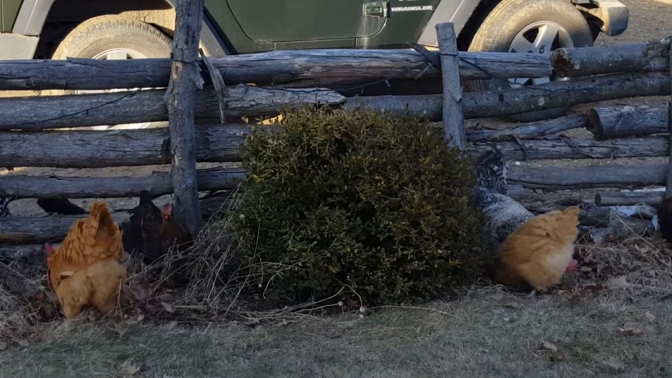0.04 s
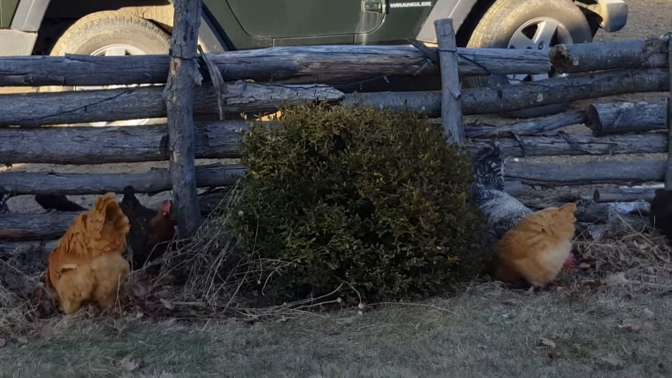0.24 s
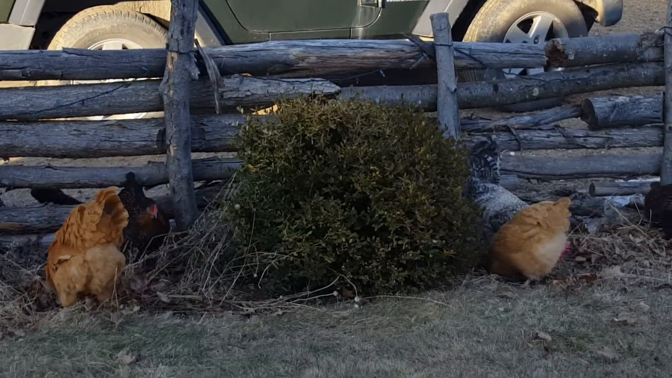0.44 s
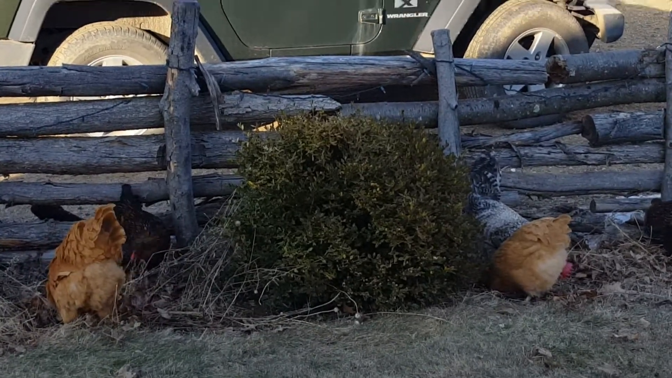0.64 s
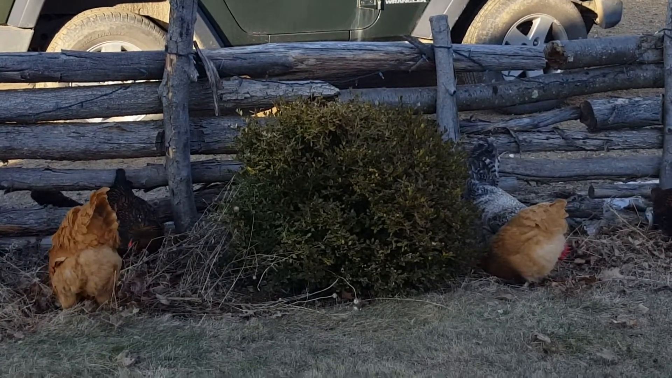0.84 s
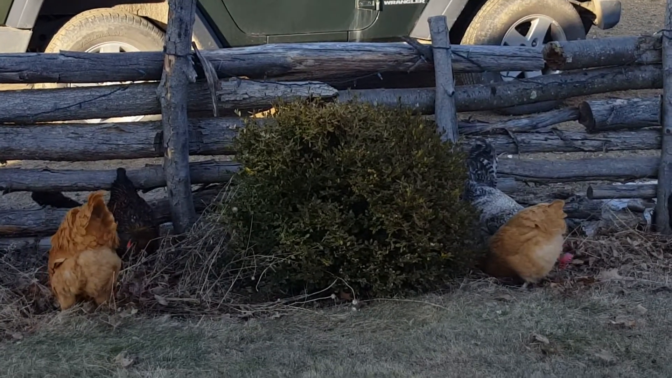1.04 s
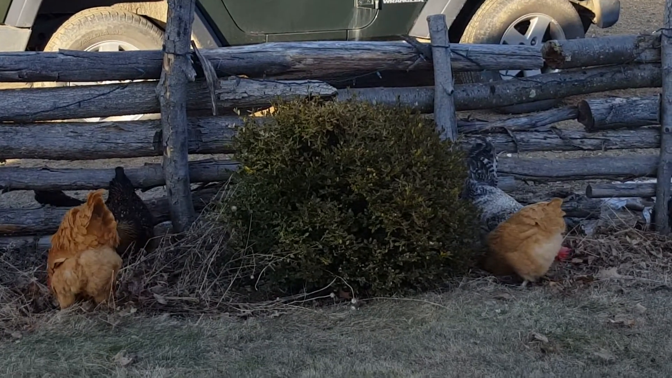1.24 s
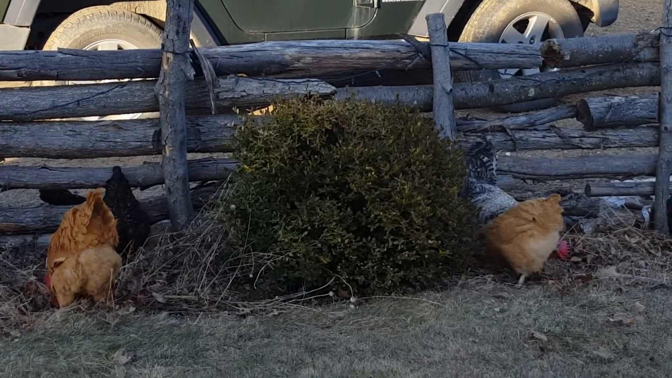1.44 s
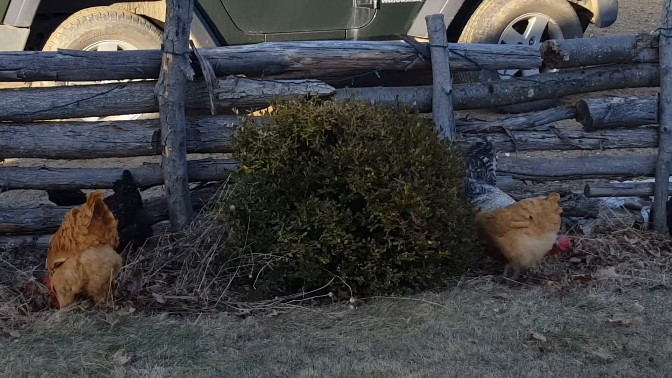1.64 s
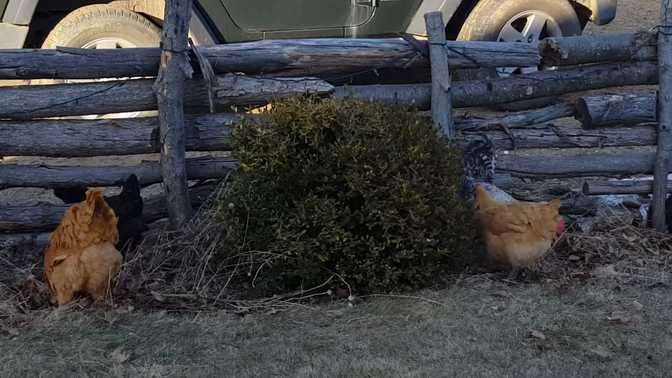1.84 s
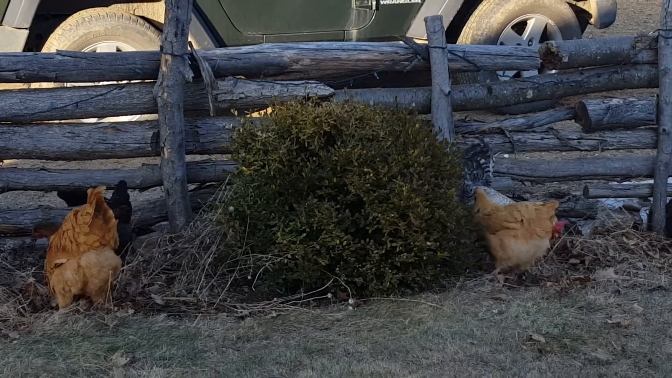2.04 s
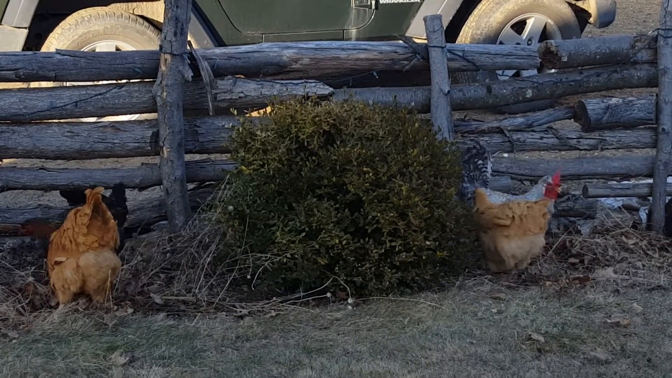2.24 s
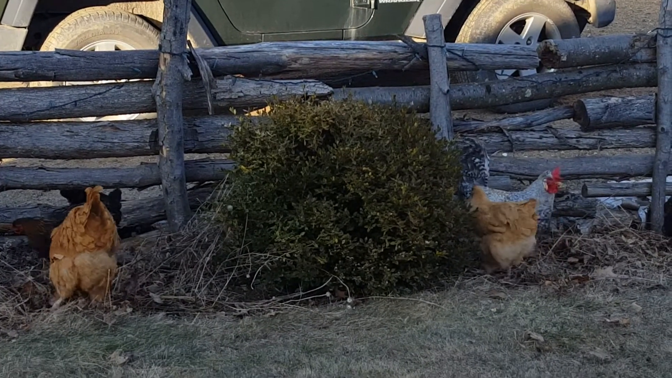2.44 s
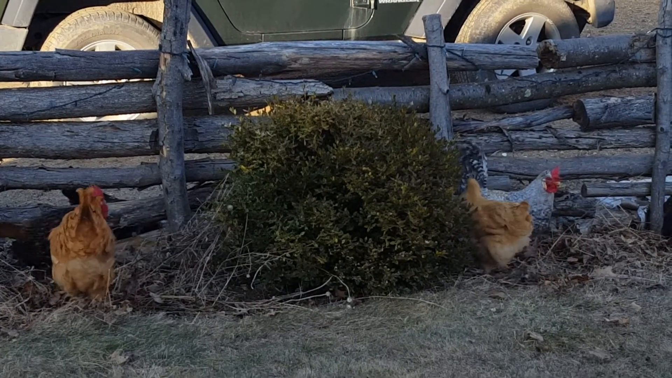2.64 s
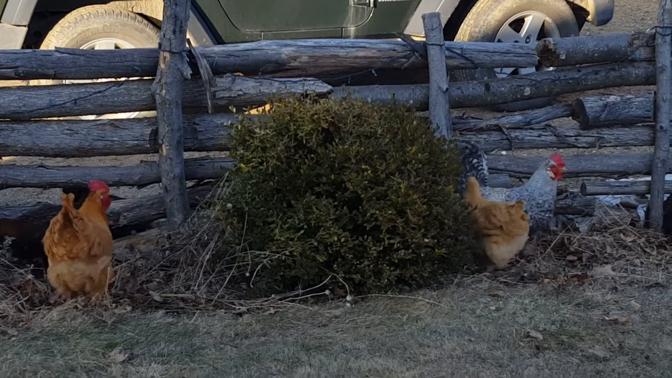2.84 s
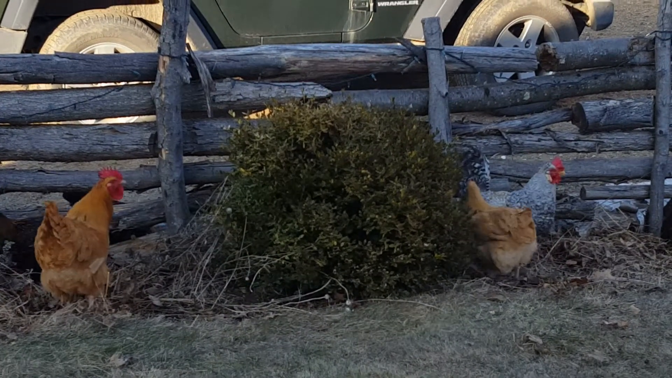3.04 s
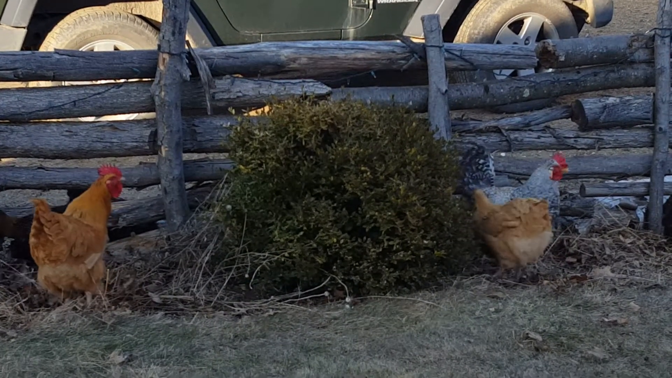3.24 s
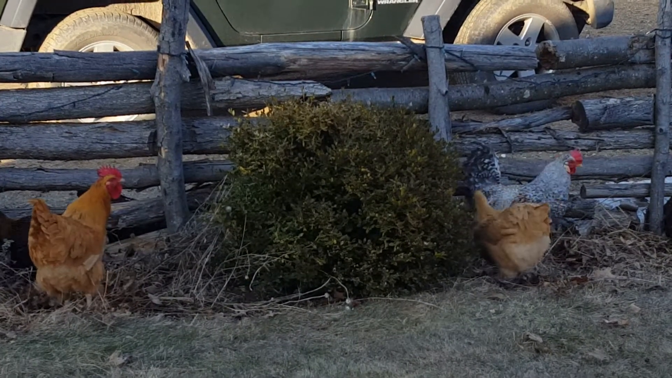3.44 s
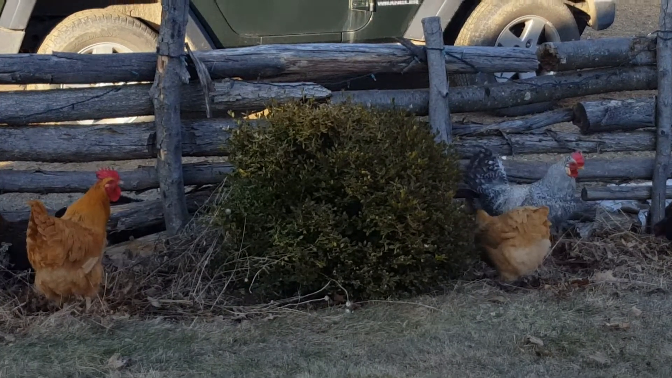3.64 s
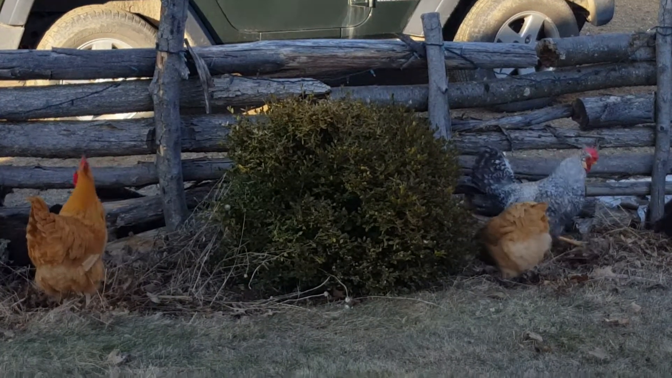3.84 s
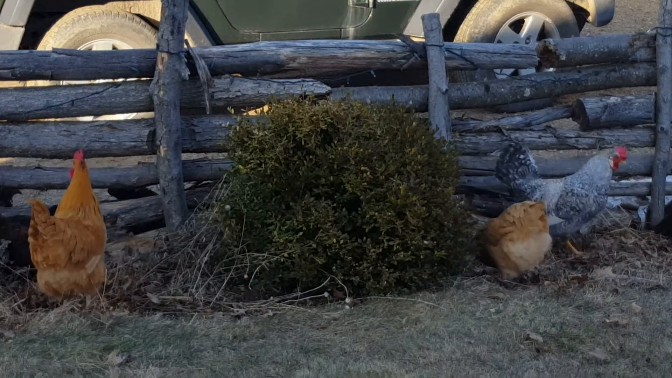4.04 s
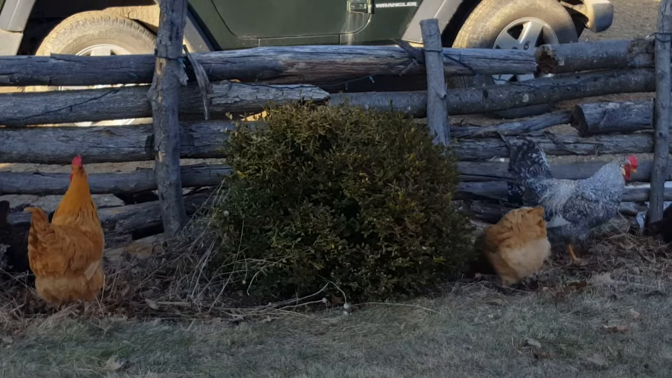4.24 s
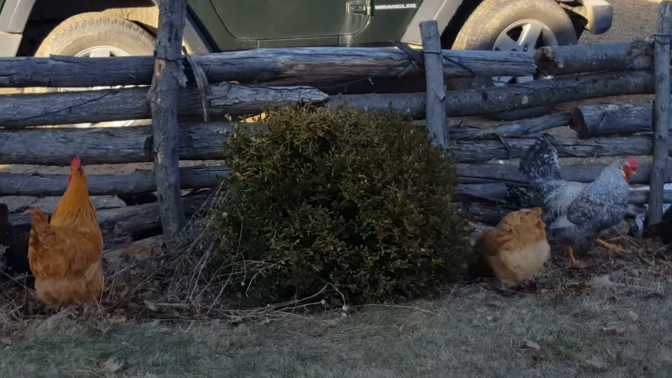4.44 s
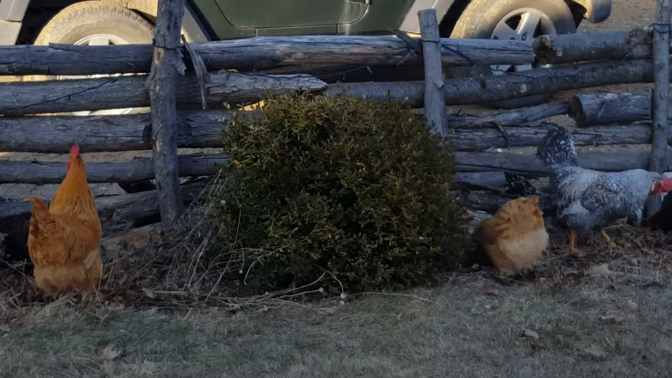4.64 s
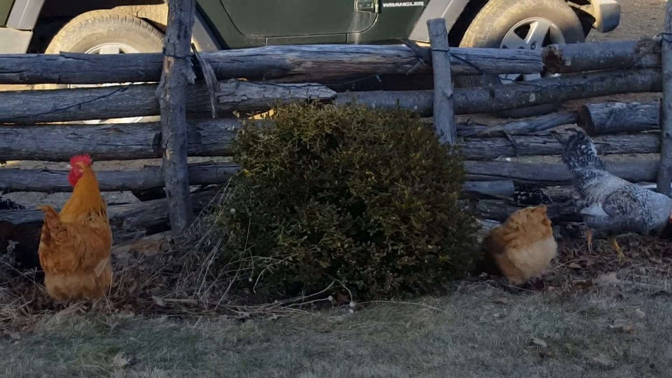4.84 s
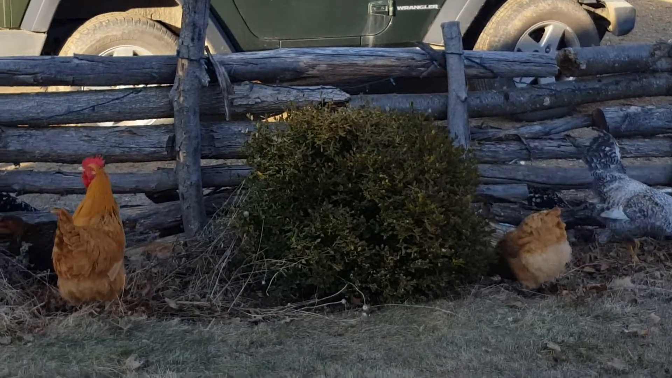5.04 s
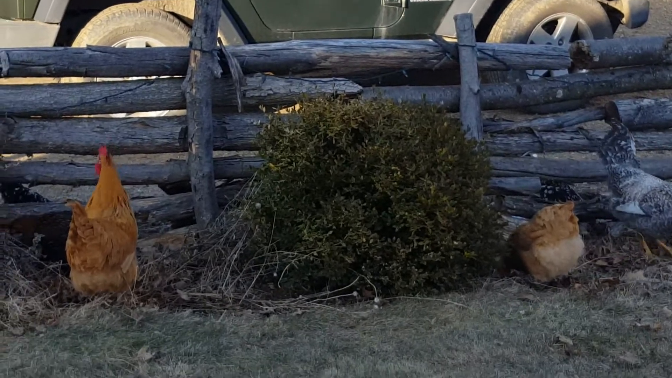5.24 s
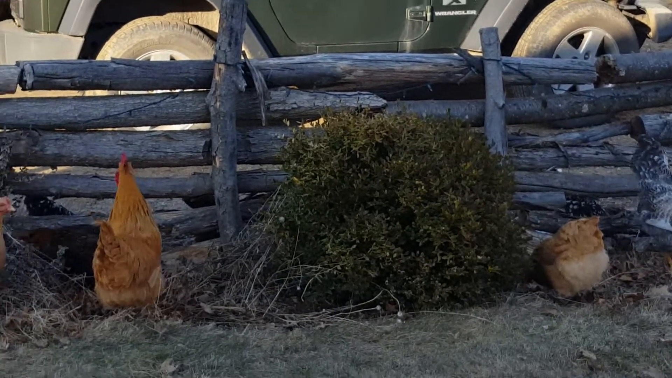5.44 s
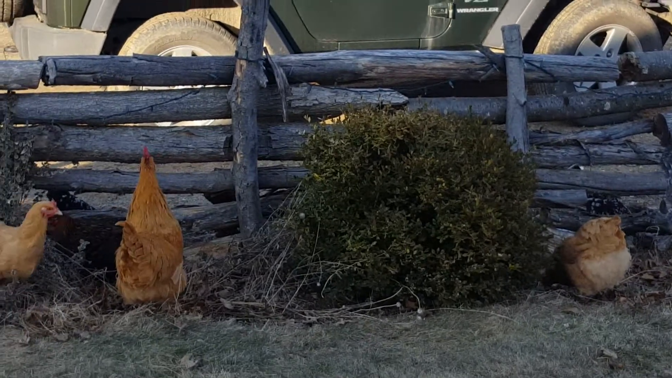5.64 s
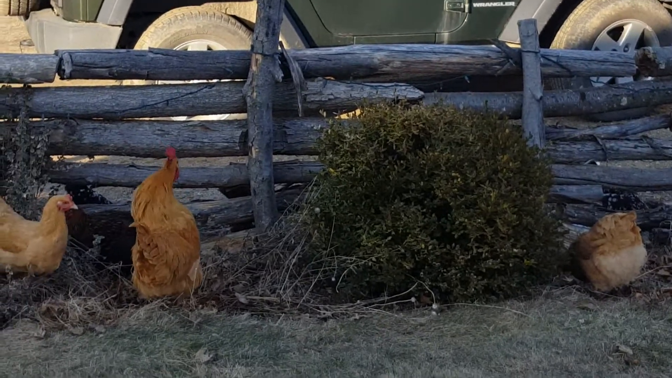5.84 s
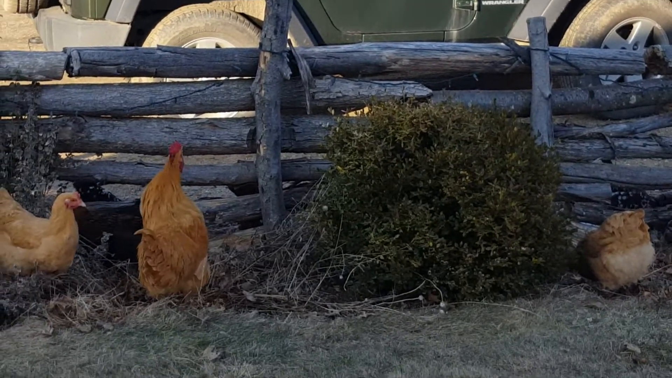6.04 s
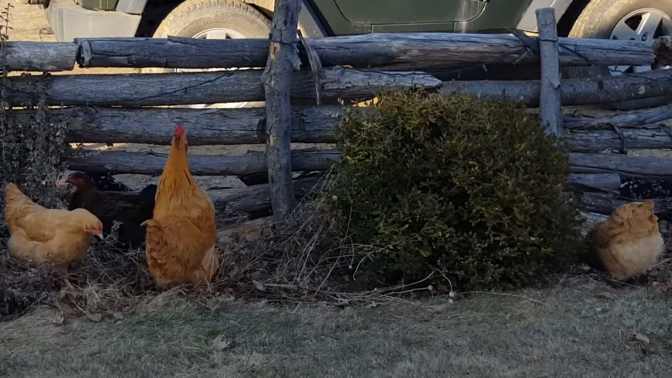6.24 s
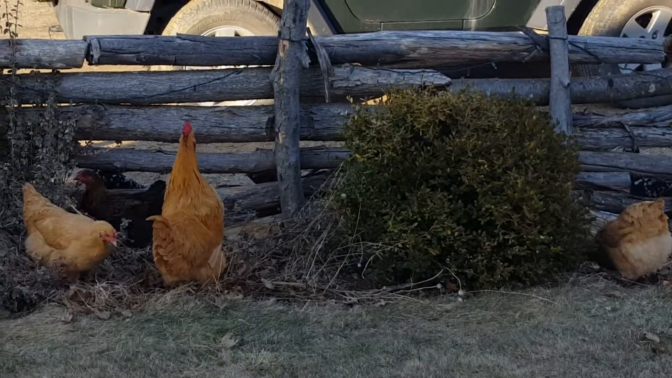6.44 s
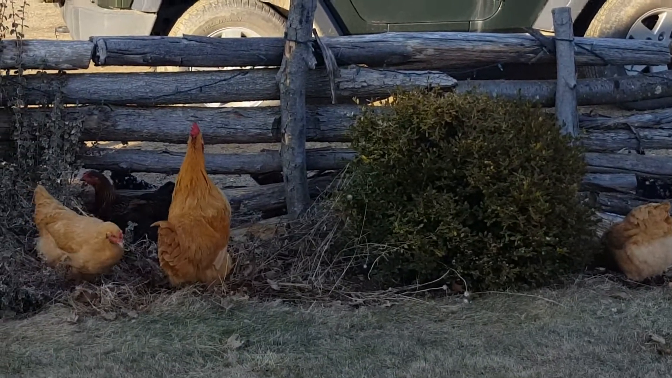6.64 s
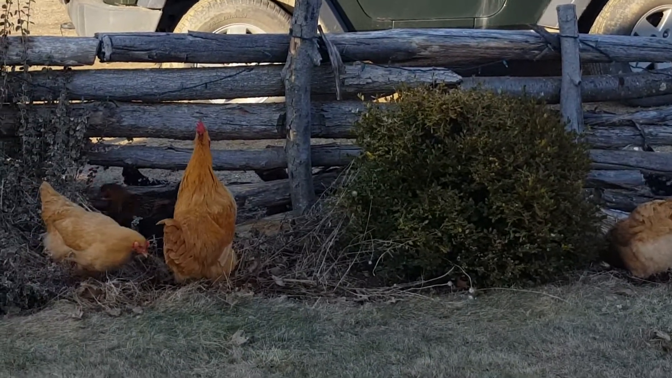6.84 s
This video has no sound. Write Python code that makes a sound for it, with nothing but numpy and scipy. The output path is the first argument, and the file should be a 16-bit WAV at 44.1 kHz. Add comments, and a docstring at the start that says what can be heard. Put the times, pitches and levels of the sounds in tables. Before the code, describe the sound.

Chickens scratch in dry leaves with a soft cluck over a faint outdoor rumble, then a nearby rooster crows loudly.

```python
"""A yard by a log fence, under a far outdoor rumble. Hens scratch in dry leaves and twigs, each stroke
a swarm of tiny cracks; one hen clucks and murmurs softly. The hand-held microphone is bumped a few
times, and a rooster close by crows: one hoarse syllable, then two in which a clear pitch rises through
the rasp. His membranes slap irregularly for the rasp, and one tightens for the clear pitch;
windpipe and beak colour the crow, and fence and sheds echo it."""
import sys
import numpy as np
from scipy import signal
from scipy.io import wavfile

SR = 44100
rng = np.random.default_rng(int(sys.argv[2]) if len(sys.argv) > 2 else 0)


def dump_mix(stems):
    """Bounce the given channels to the path in sys.argv[1] as a 16-bit WAV at rate SR."""
    frames = np.atleast_2d(stems).T  # one column per channel
    limited = np.clip(frames, -1, 1)  # hard clip at full scale
    pcm = np.round(limited * 32767).astype(np.int16)
    wavfile.write(sys.argv[1], SR, pcm)


N = 304290

# The crow's syllables. Each row: start, push and end in seconds, rasp level in dB, change by the end
# in dB, then the slack membrane's first pitch in Hz, held pitch in Hz and level in dB.
SYLLABLES = [(5.961, 6.013, 6.155, -20, -1, 724, 673, -29), (6.254, 6.298, 6.385, -23, -5, 684, 631, -25.5),
             (6.487, 6.524, 6.95, -21, -1.5, 635.8, 652, -22.5)]
START_DB, LEAD_IN_DB, RELEASE_DB = -29, -4.5, -27   # stages of a syllable, against full strength
PUSH_S = 0.017   # from lead-in to full strength
STAMP_DB_PER_S = 1197   # attack of a stroke that sets in at once


def rasp():
    """The rooster's membranes slap irregularly; the pulses ring his windpipe and beak."""
    # Throat resonances, neck bent and neck stretched. Each row: centre in Hz, width in Hz, level in dB.
    neck_bent = [(514, 97, -9.5), (710, 300, -12), (1106, 157, -2.5), (1374, 72, 6), (1730, 360, -25),
                 (2010, 350, -26), (2556, 174, -22), (3590, 730, -36), (4570, 620, -30), (5450, 230, -34.5),
                 (6050, 1200, -35.5), (11500, 6200, -48)]
    neck_stretched = [(666, 49, -3), (980, 180, -12.5), (1280, 293, -2), (1846, 54, -14), (1972, 143, -12),
                      (2733, 244, -21), (3520, 590, -37), (4860, 750, -34), (6170, 610, -33.5),
                      (7370, 700, -38), (10140, 2700, -40), (13200, 2400, -48)]
    pulses = grains(1400, spread_db=-1.0)[0, 0] * from_db(0.69 * drift(52))
    out, first = np.zeros(N), int(SYLLABLES[0][0] * SR) - SR // 10
    for syllable, throat in zip(SYLLABLES, (neck_bent, neck_stretched, neck_stretched)):
        curve = effort(*syllable[:5])
        envelope = from_db(in_time(curve)[0]) * gate(curve)
        # each resonance acts twice, which leaves dark valleys between them
        rung = sum((-1) ** k * from_db(db) * steep_resonance(pulses[first:], hz, width_hz)
                   for k, (hz, width_hz, db) in enumerate(throat))
        out[first:] += envelope[first:] * rms_one(rung)
    return out


def clear_voice():
    """One membrane tightens to a clear pitch in the last two syllables."""
    # Each row: slack pitch in Hz, accent at the push in dB, held level in dB, swell in dB per second,
    # moment of slackening in seconds.
    notes = [(691, -22, -27.5, 155, 6.383), (664, -16, -25, -4.5, 6.95)]
    # Each row: multiple of the pitch, level in dB. Alternating strong and weak cycles give the halves.
    partials = [(1, 4), (1.5, -9), (2, -6), (2.5, -14.5), (3, -20.5), (3.5, -23), (6, -22), (7, -31),
                (8, -24)]
    voice = sum(voiced(tightening(*syllable[:2], *note), partials,
                       wobble=.011, flutter_db=3.0, slack_db=56, waver=.011)
                for syllable, note in zip(SYLLABLES[1:], notes))
    windpipe = from_db(3) * resonance(voice, hz=1393, width_hz=92)   # lifts the overtone that passes it
    return voice + windpipe


def slack_buzz():
    """The other membrane stays slack and buzzes unsteadily below the clear pitch."""
    # Each row: multiple of the pitch, level in dB.
    partials = [(1, -9), (2, -1.5), (3, -19)]
    out = 0
    for start, push, end, _, change_db, first_hz, held_hz, db in SYLLABLES:
        curve = [(s, np.interp(s, [start, push], [first_hz, held_hz]), level_db)
                 for s, level_db in effort(start, push, end, db, change_db)]
        out = out + voiced(curve, partials, wobble=.022, flutter_db=4.0, waver=0.0117)
    return out


def effort(start, push, end, db, change_db):
    """Level curve of a syllable: it opens quickly to a soft lead-in, is pushed, held and released."""
    last_db = db + change_db
    return [(start, db + START_DB), (start + 0.0052, db - 7.5),
            (push - PUSH_S, db + LEAD_IN_DB), (push, db), (end, last_db),
            (end + PUSH_S, last_db + LEAD_IN_DB), (end + .06, last_db + RELEASE_DB)]


def tightening(start, push, slack_hz, accent_db, held_db, swell_db_per_s, slackens):
    """Pitch and level curve of the clear voice: accent on the slack pitch, rise, hold, drop."""
    taut_hz, tighten_s, slacken_s = 784.4, .03, 0.0277
    taut = push + tighten_s
    last_db = held_db + swell_db_per_s * (slackens - taut)
    return [(start, slack_hz, accent_db + START_DB),
            (push - PUSH_S, slack_hz, accent_db - 18.5),
            (push, slack_hz, accent_db),
            (push + tighten_s / 2, (slack_hz + taut_hz) / 2, held_db - 6),   # dips midway up
            (taut, taut_hz, held_db),
            (slackens, taut_hz, last_db),
            (slackens + slacken_s / 2, taut_hz - 25, last_db + LEAD_IN_DB),
            (slackens + slacken_s, slack_hz, last_db + 2 * LEAD_IN_DB),
            (slackens + 2 * slacken_s, slack_hz, last_db + RELEASE_DB)]


def yard(x):
    """Direct sound plus quick echoes off fence and sheds, one part centred, one opposed left to right."""
    t, t60_s = np.arange(SR // 5) / SR, 0.22
    scatter = rng.standard_normal((2, len(t))) * from_db(-60 * t / t60_s) * (t > .004)
    scatter /= np.sqrt(np.sum(scatter ** 2, axis=1, keepdims=True))
    centre, sides = signal.fftconvolve(x[None], scatter, axes=1)[:, :N]
    sides = signal.lfilter(*signal.butter(1, 1900, "high", fs=SR), sides)
    return x + from_db(-6) * centre + from_db(-1) * sides * [[1], [-1]]


def hen():
    """A cluck, its after-note and a falling murmur: short voiced notes that swell and fade."""
    # Each row: start and length in seconds, first and last pitch in Hz, peak level in dB.
    notes = [(1.101, 0.048, 313, 312, -45), (1.163, 0.051, 314, 316, -62.5), (4.923, 0.054, 341, 220, -64)]
    # Each row: multiple of the pitch, level in dB.
    partials = [(1, -8.5), (2, 0), (3, -19), (4, -10.5)]
    out, peak_share = 0, 0.56
    for s, length_s, first_hz, last_hz, db in notes:
        curve = [(s, first_hz, db - 7),
                 (s + peak_share * length_s, first_hz + peak_share * (last_hz - first_hz), db),
                 (s + length_s, last_hz, db - 10.5)]
        out = out + voiced(curve, partials, wobble=0.0375, flutter_db=3.5)
    return out


def leaves():
    """Thousands of tiny cracks a second merge into a rustle under each stroke of a foot."""
    # Tone of dry leaves. Each row: frequency in Hz, relative level in dB.
    spectrum = [(300, 7.5), (652, 7.5), (953, 3), (1200, 5.5), (2400, 3), (4140, 1), (7000, 0), (12500, -3),
                (15500, 0)]
    # Shifting colour of the rustle. Each row: time in seconds, treble lift in dB per octave,
    # bass lift in dB per two octaves.
    colour = [(0, 1, -4.5), (.6, 1, -3.5), (1, 5.5, 0), (1.6, -0.5, -1), (2.1, 2, -5), (2.8, 1.5, -8.5),
              (3.4, 1, -5), (3.7, 2, -4.5), (4.1, 1.5, -2), (4.8, 3.5, -1.5), (5.2, 1, -2), (5.9, -0.5, 0)]
    crisp_db, weight_db = in_time(colour)
    # whole leaves give way in short crunches
    collapses, crunch_s = np.abs(grains(70, spread_db=3.5)[:, :1]), .005
    crunch = signal.lfilter([1], [1, -np.exp(-1 / (crunch_s * SR))], collapses)
    crackle = grains(2000, spread_db=1.5) + 0.79 * rng.standard_normal((2, 2, N))
    crackle *= rms_one(1 + from_db(-7.5) * rms_one(crunch))
    rustle = bands(crackle, spectrum, patchy_db=1.3, low_db=weight_db, high_db=crisp_db)
    # the crispest leaves break with lone bright ticks on a fine sizzle, nearer the right
    leaf_breaks, stalk_breaks = grains(45, spread_db=1.0)[0]
    sizzle = leaf_breaks + 1.5 * rng.standard_normal((2, N))
    ticks = from_db(-9.5 + 3.4 * crisp_db) * steep_resonance(sizzle, hz=12300, width_hz=3200)
    stalks = from_db(-13.0) * steep_resonance(stalk_breaks, hz=1640, width_hz=4200)
    return from_db(scratching_db() + 3) * (rustle + ticks * from_db([[-2], [2]]) + stalks)


def scratching_db():
    """Envelope of the rustle: the powers of all foot strokes add over a faint steady floor."""
    # Strokes that dig in, and strokes that begin with a stamp.
    # Each row: time of the peak in seconds, drag in seconds, level in dB.
    strokes = [(0, 0.013, -46.5), (.1, .12, -60.5), (.59, 0.016, -52.5), (.74, 0.11, -57.5),
               (1.42, 0.19, -68), (1.86, 0.089, -70), (1.97, 0.078, -63.5), (2.12, 0.035, -60),
               (2.25, 0.14, -64), (2.43, 0.054, -63.5), (2.6, 0.26, -63.5), (2.82, 0.027, -61),
               (2.958, 0.0097, -56), (3.085, 0.09, -49.5), (3.27, 0.071, -50.5), (3.42, 0.0075, -59),
               (3.55, 0.029, -73), (3.858, 0.032, -60), (3.99, 0.1, -60.5), (4.15, 0.13, -67),
               (5.12, 0.044, -60), (5.27, 0.052, -59), (5.53, 0.05, -56.5), (5.65, 0.062, -62),
               (6.46, 0.13, -52)]
    stamps = [(.325, 0.19, -53), (3.504, 0.01, -52), (4.6, .25, -68.5), (5.845, 1.1, -59)]
    t, still_db = np.arange(0, N / SR, .001), -73
    power = from_db(2 * still_db)
    for rows, dig_db_per_s in ((strokes, 224), (stamps, STAMP_DB_PER_S)):
        power = power + sum(from_db(2 * stroke_db(t, *row, dig_db_per_s)) for row in rows)
    return in_time(np.transpose([t, 10 * np.log10(power)]))[0]


def stroke_db(t, peak_s, drag_s, db, dig_db_per_s):
    """Envelope of one stroke: the foot digs in, the level sags during the drag, the litter settles."""
    since = t - peak_s
    dig_db = dig_db_per_s * np.maximum(-since, 0)
    sag_db = 8 * np.clip(since, 0, min(drag_s, .3))
    settle_db = 110 * np.maximum(since - drag_s, 0)
    return db - (dig_db + sag_db + settle_db)


def twigs():
    """Dragged twigs rattle: uneven knocks ring a broad, hollow mode of the wood."""
    # Each row: time of the peak in seconds, drag in seconds, level in dB, ring in Hz.
    drags = [(.585, 0.13, -57, 1230), (.59, 0.22, -64, 1900), (3.08, 0.081, -58, 2000),
             (5.22, 0.06, -63, 1860)]
    knocks, t = grains(440, spread_db=-0.5)[0, 0], np.arange(N) / SR
    return sum(rms_one(steep_resonance(knocks, hz, width_hz=280))
               * from_db(stroke_db(t, s, drag_s, db, STAMP_DB_PER_S)) for s, drag_s, db, hz in drags)


def snaps():
    """Single leaves and twigs break with a short, dry ring."""
    # Each row: start in seconds, peak in dB, ring in Hz, left over right in dB.
    breaks = [(.596, -38, 1520, 0), (1.006, -45.5, 1290, 8), (1.552, -45, 3700, 0), (2.626, -43, 12230, 0),
              (3.479, -40, 9300, 0), (3.5035, -38, 1740, 2), (3.774, -35, 7160, 7.5),
              (3.791, -40, 9950, 1.5), (4.075, -37.5, 12500, 8), (4.21, -40, 12800, 13),
              (4.224, -45, 12500, -10), (4.305, -50, 2660, 6), (4.313, -48.5, 1740, 20),
              (4.834, -41, 11700, 9), (4.949, -48, 12000, 2), (5.5155, -38, 12000, 0)]
    return strikes(breaks, puff_s=0.0025, cycles=3.3)


def microphone_bumps():
    """A soft push rings the microphone body for a cycle or two, mostly on one side."""
    # Each row: start in seconds, peak in dB, ring in Hz, left over right in dB.
    bumps = [(5.137, -45, 222, 21.5), (5.682, -46, 168, -19), (5.701, -46.5, 150, -22),
             (5.842, -41, 142, -18), (5.871, -39.5, 150, -13), (5.906, -46.5, 154, -28),
             (5.988, -34.5, 156, -15), (6.562, -24, 281, -18)]
    out, push = np.zeros((2, N)), signal.unit_impulse(SR // 10)
    for s, db, hz, pan_db in bumps:
        place(out, steep_resonance(push, hz, 0.72 * hz), s, db, pan_db)
    # the hardest bump also ticks sharply
    return out + strikes([(6.5643, -11.5, 4000, -8)], puff_s=0.0003, cycles=1.0)


def rumble():
    """Far traffic and breeze blur into a low, steady noise."""
    # Each row: frequency in Hz, relative level in dB.
    spectrum = [(30, -35), (43, -8), (102, 3), (191, 0), (260, -7), (468, -18.5), (937, -24), (1560, -50)]
    return from_db(-56.5) * rms_one(bands(rng.standard_normal((2, 2, N)), spectrum, patchy_db=-0.46))


def voiced(curve, partials, wobble, flutter_db, slack_db=0, waver=0):
    """Fluttering partials on a pitch that wobbles fast and wavers slowly, both as shares of the pitch."""
    out = gate(curve)
    on = out > 0
    hz, db = np.array(in_time(curve))[:, on]
    dulling_db = slack_db * (1 - hz / hz.max())   # overtones fade while the pitch is slack
    unsteady_hz = hz * (1 + wobble * drift(185)[on] + waver * drift(12.1)[on])
    phase = 2 * np.pi * np.cumsum(unsteady_hz) / SR
    tone = sum(from_db(level_db + flutter_db * drift(106)[on] - dulling_db * max(k - 2, 0))
               * np.sin(k * phase + k * k) for k, level_db in partials)
    out[on] *= np.sqrt(2) * from_db(db) * tone
    return out


def strikes(events, puff_s, cycles):
    """Each strike is a dying puff of noise that sounds a broad ring and a woody crack."""
    out, t = np.zeros((2, N)), np.arange(SR // 10) / SR
    for s, db, hz, pan_db in events:
        puff = rng.standard_normal(len(t)) * np.exp(-t / puff_s)
        crack = 0.58 * resonance(puff, hz=2100, width_hz=2000)
        place(out, resonance(puff, hz, hz / cycles) + crack, s, db, pan_db)
    return out


def place(out, hit, s, peak_db, pan_db):
    """Scale a hit to its peak, pan it and mix it in."""
    i = round(s * SR)
    gains = from_db(peak_db + np.array([[.5], [-.5]]) * pan_db)
    out[:, i:i + len(hit)] += gains * hit / np.abs(hit).max()


def bands(source, spectrum, patchy_db, low_db=0, high_db=0):
    """Half-octave bands, each with its own level, flicker and width; lows and highs tilt about 4 kHz."""
    # Stereo image. Each row: frequency in Hz, likeness of left and right from -1 to 1.
    likeness = [(60, 0.98), (240, 0.8), (950, 0.39), (3770, 0.02), (15000, -0.42)]
    out, together, edges = 0, drift(9), 30 * 2 ** np.arange(0, 9.1, .5)
    for k, (low, high) in enumerate(zip(edges, np.minimum(edges[1:], .36 * SR))):
        hz = np.sqrt(low * high)
        if hz > 1.3 * spectrum[-1][0] or hz < spectrum[0][0] / 1.3:
            continue
        bandpass = signal.butter(2, [low, high], "band", fs=SR, output="sos")
        mid, side = signal.sosfilt(bandpass, source[k % 2])
        alike = np.clip(at_hz(likeness, hz), -1, 1)
        octaves = np.log2(hz / 4000)
        lift_db = high_db * np.clip(octaves, 0, 1.5) + low_db * np.clip(-octaves / 2, 0, 1.5)
        flicker_db = patchy_db * (0.1 * together + drift(6.4))
        gain = from_db(at_hz(spectrum, hz) + lift_db + flicker_db)
        out = out + gain * (np.sqrt(1 + alike) * mid + np.sqrt(1 - alike) * side * [[1], [-1]])
    return out


def grains(per_s, spread_db):
    """Random clicks of uneven size: two pairs of unrelated streams."""
    sizes = from_db(spread_db * np.minimum(rng.exponential(1, (4, N)), 5)) * rng.choice([-1, 1], (4, N))
    clicks = sizes * (rng.random((4, N)) < per_s / SR)
    return rms_one(clicks).reshape(2, 2, N)


def drift(rate_hz):
    """Smooth random wander with a spread of about 1."""
    r = np.exp(-40 * np.pi * rate_hz / SR)
    slow = signal.lfilter([1], [1, -2 * r, r * r], rng.standard_normal(N // 20 + 4002))[4000:]
    return np.interp(np.arange(N) / 20, np.arange(len(slow)), rms_one(slow))


def resonance(x, hz, width_hz):
    """Two-pole peak with gain 1 on top."""
    r = np.exp(-np.pi * width_hz / SR)
    poles = [1, -2 * r * np.cos(2 * np.pi * hz / SR), r * r]
    return signal.lfilter([(1 - r * r) / 2, 0, (r * r - 1) / 2], poles, x + 1e-18)


def steep_resonance(x, hz, width_hz):
    """A resonance applied twice for steep flanks."""
    return resonance(resonance(x, hz, width_hz), hz, width_hz)


def in_time(curve):
    """Values of a curve at every sample; its rows begin with a time in seconds."""
    s, *columns = np.transpose(curve)
    return [np.interp(np.arange(N) / SR, s, column) for column in columns]


def gate(curve):
    """Open while a curve lasts, with 4 ms fades."""
    t = np.arange(N) / SR
    return np.clip(np.minimum(t - curve[0][0], curve[-1][0] + .01 - t) / .004, 0, 1)


def at_hz(points, hz):
    """Read a table on a log frequency axis."""
    frequencies, values = np.transpose(points)
    return np.interp(np.log(hz), np.log(np.maximum(frequencies, 1)), values)


def from_db(db):
    """Decibels to gain."""
    return 10 ** (np.asarray(db) / 20)


def rms_one(x):
    """Scale to rms 1."""
    return x / np.sqrt(np.mean(x ** 2) + 1e-20)


def scene():
    """The crow and its echoes over the hens, the bumps and the rumble, in stereo."""
    crow = rasp() + clear_voice() + slack_buzz()
    # the small windpipe radiates little below its lowest resonance
    crow = signal.sosfilt(signal.butter(4, 480, "high", fs=SR, output="sos"), crow)
    rooster = yard(crow) * from_db([[-.3], [.3]])
    return rooster + hen() + snaps() + microphone_bumps() + leaves() + twigs() + rumble()


def record(dry):
    """A steep low-pass cuts the very top."""
    cutoff_hz = 15725
    return signal.sosfilt(signal.ellip(16, .5, 95, cutoff_hz, fs=SR, output="sos"), dry)


dry = scene()
out = record(dry)
dump_mix(out)
```